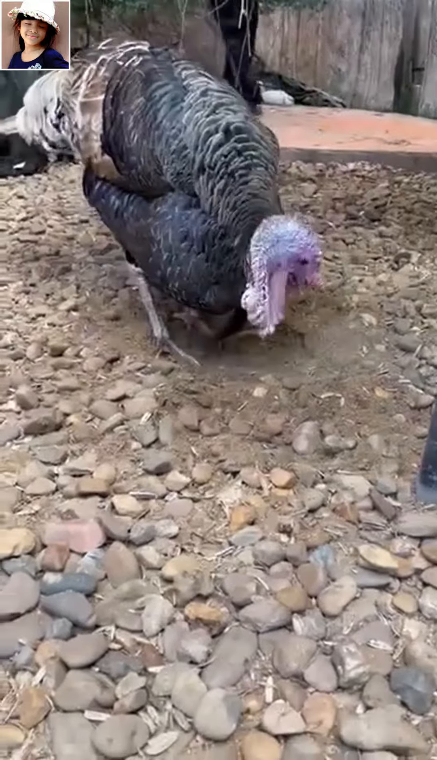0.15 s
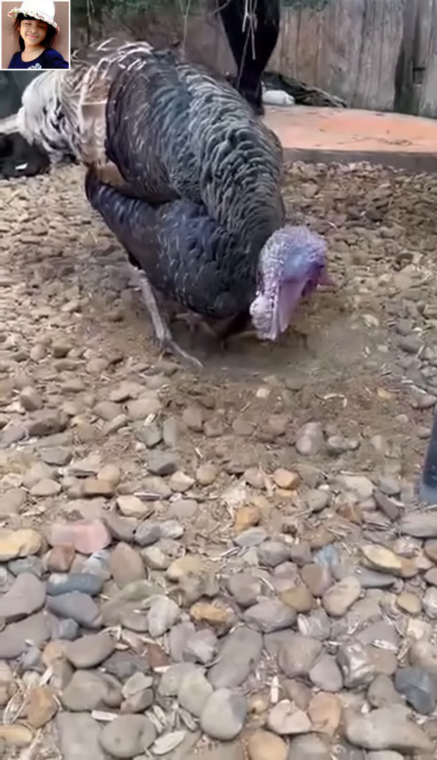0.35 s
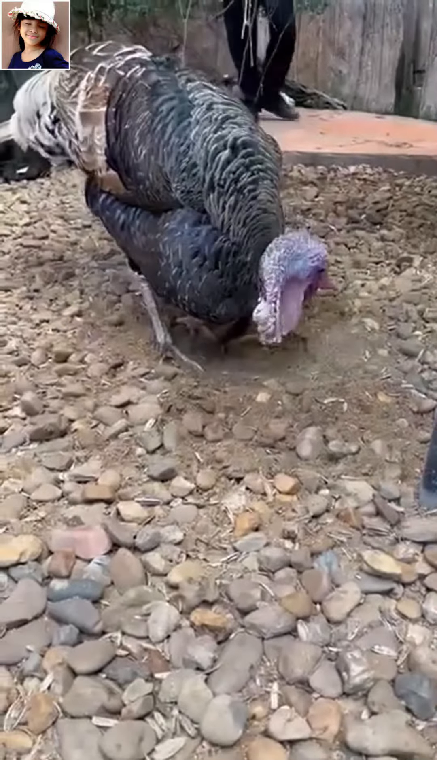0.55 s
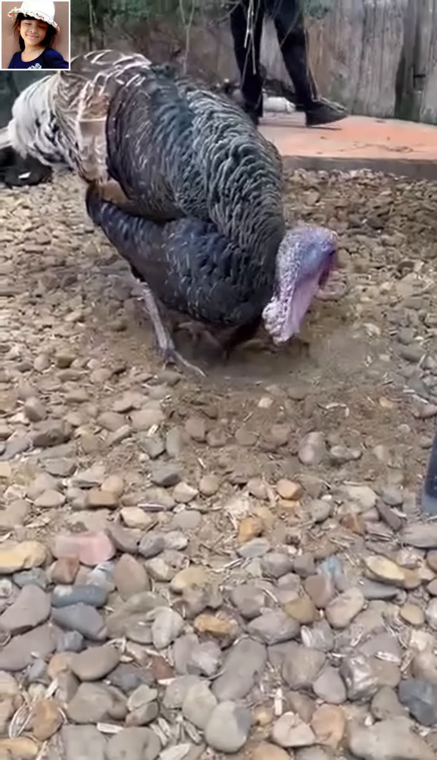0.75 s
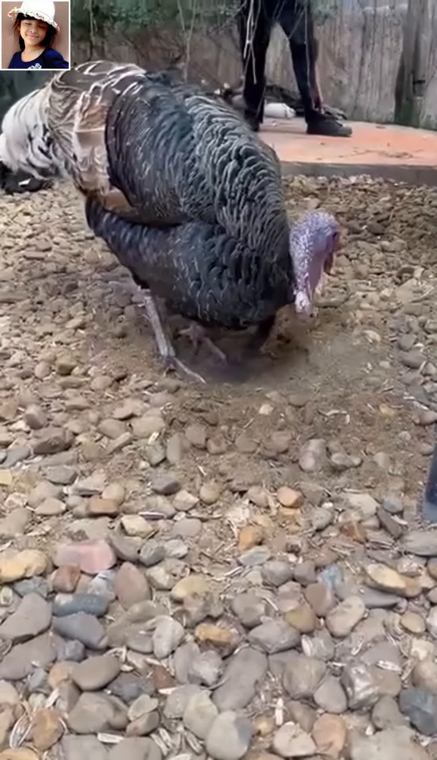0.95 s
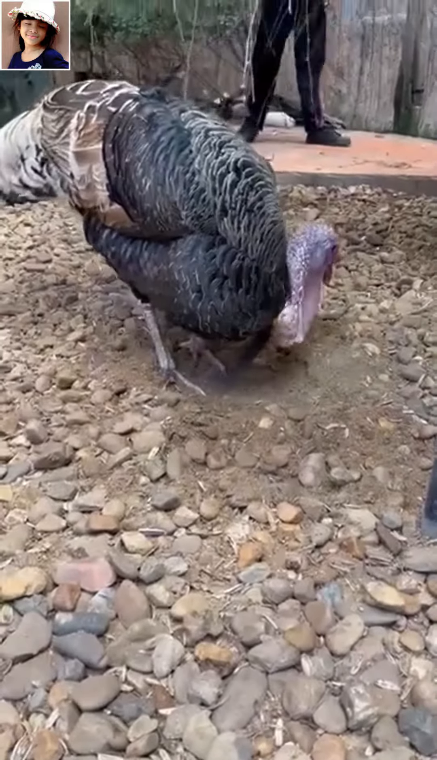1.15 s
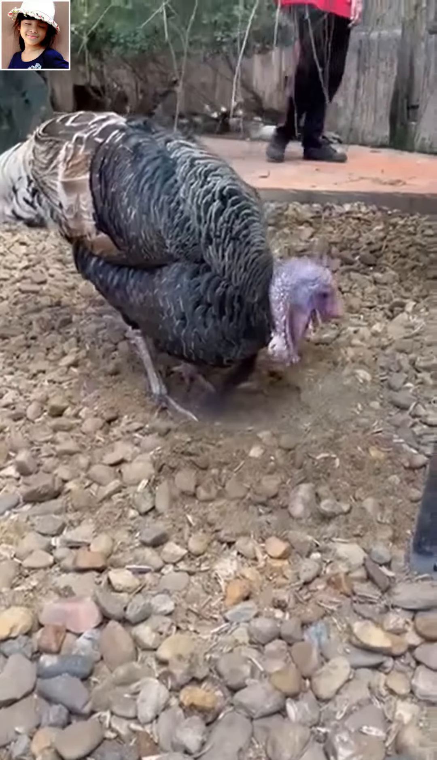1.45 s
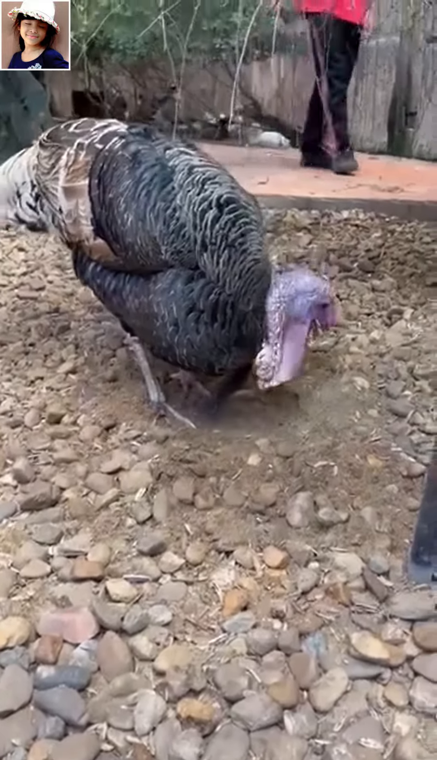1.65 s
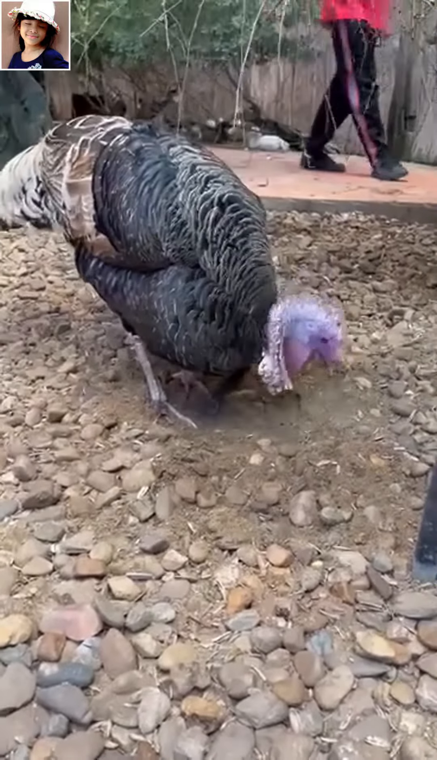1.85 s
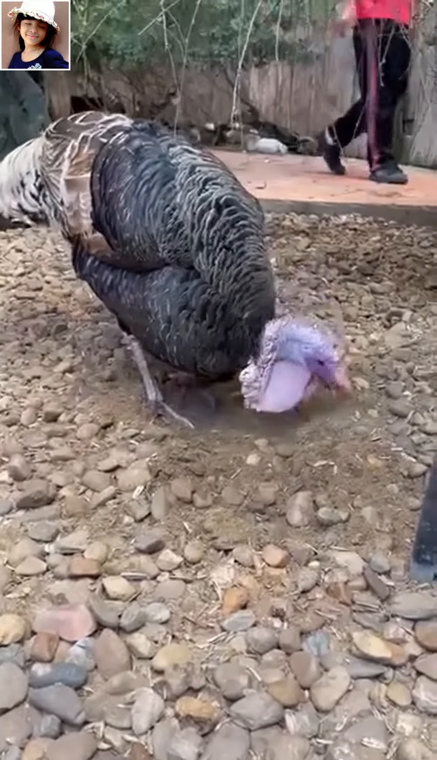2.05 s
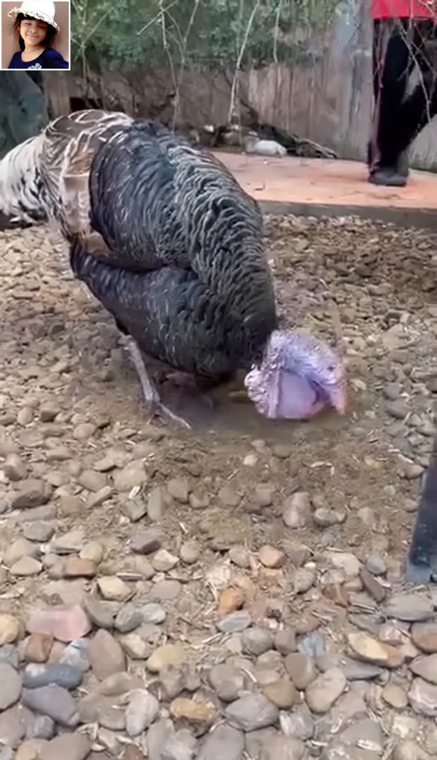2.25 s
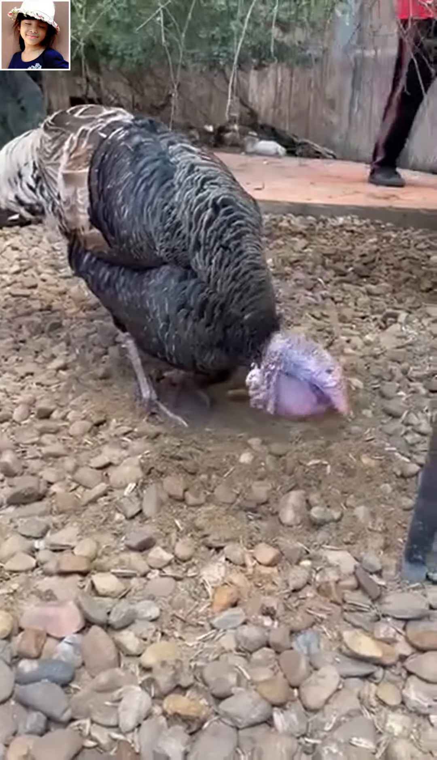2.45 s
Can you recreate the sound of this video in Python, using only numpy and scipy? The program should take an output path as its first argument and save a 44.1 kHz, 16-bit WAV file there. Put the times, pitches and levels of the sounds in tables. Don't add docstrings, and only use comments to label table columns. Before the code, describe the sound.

A close turkey gobbles in a loud, rapid, rattling burst, overlapped by a lower second bird, after quiet wind bumps, faint rustles and three thin whistled notes in a fenced gravel yard, on a handheld stereo microphone.

```python
import sys
import numpy as np
from scipy import signal
from scipy.fft import rfft, irfft, next_fast_len
from scipy.io import wavfile
from scipy.ndimage import uniform_filter1d

SR = 44100
rng = np.random.default_rng(int(sys.argv[2]) if len(sys.argv) > 2 else 0)


def voltage_ratio(decibels):
    exponent = np.asarray(decibels, float) / 20
    return 10 ** exponent


def unload_wav(signal):
    wavfile.write(
        sys.argv[1],
        SR,
        np.round(np.clip(np.atleast_2d(signal).T, -1, 1) * 32767).astype(np.int16),
    )


N = 114660


def evened(x):
    return x / np.sqrt(np.mean(x ** 2) + 1e-20)


def read(points, hz):
    f, value = np.transpose(points)
    return np.interp(np.log(hz + 1), np.log(f + 1), value)


def add(mix, s, sound):
    part = mix[round(s * SR):][:len(sound)]
    part += sound[:len(part)]


def resonate(x, hz, width):
    turn = np.exp(2j * np.pi * np.cumsum(hz * np.ones(len(x))) / SR)
    r = np.exp(-np.pi * width / SR)
    smooth = signal.lfilter([(1 - r) ** 2], [1, -2 * r, r * r], x / turn + 1e-18)
    return 2 * (turn * smooth).real


def noise(spectrum, same, patchy_db, level, size):
    frames, hz = 4 * N // size + 5, np.fft.rfftfreq(size, 1 / SR)
    a, b, c, d, patch = rng.standard_normal((frames, len(hz), 5)).T
    patch = uniform_filter1d(uniform_filter1d(patch, size=6, axis=0), size=6, axis=1)
    patch = evened(patch)
    first, other = a + 1j * b, c + 1j * d
    z = np.array([first, same * first + np.sqrt(1 - same ** 2) * other])
    z *= voltage_ratio(read(spectrum, hz)[:, None] + patchy_db * patch)
    z *= (hz >= spectrum[0][0])[:, None]
    x = signal.istft(z, nperseg=size, noverlap=3 * size // 4)[1][:, :N]
    return evened(x) * voltage_ratio(np.interp(np.arange(N) / SR, *np.transpose(level)))


# f/Hz, level/dB per Hz
WIND_SPECTRUM = [(12, -34), (20, -2), (87, -1), (193, -15), (261, -22), (400, -30), (520, -32.5),
                 (880, -120)]
# t/s, level/dB
GUSTS = [(0, -47), (.2, -53), (.4, -49.5), (1.2, -48.5), (1.3, -43), (1.6, -45.5), (1.8, -42), (2.3, -33),
         (2.6, -41.5)]


def wind():
    return voltage_ratio([[-2.5], [2.5]]) * noise(WIND_SPECTRUM, same=0.3, patchy_db=-4.0, level=GUSTS, size=2048)


# f/Hz, level/dB per Hz
HISS_SPECTRUM = [(120, -14), (200, -9.5), (621, -15), (803, -17.5), (2490, -20.5), (2830, -13),
                 (7890, -18.5), (11800, -16), (15800, -28.5)]
# t/s, level/dB
STIR_LEVEL = [(.9, 0), (1.1, 5), (1.5, 7.5), (1.62, 4.5), (1.7, 15), (2.3, 18.5), (2.4, 20), (2.6, 14.5)]


def yard_hiss():
    return voltage_ratio(-61.5) * noise(HISS_SPECTRUM, same=0.19, patchy_db=1.5, level=STIR_LEVEL, size=1024)


# t/s, length/s, level/dB, centre f/Hz, sag/share of f
BRUSHES = [
    (0.097, 0.066, -59, 7400, 0.019),
    (0.172, 0.13, -54, 6000, 0.3),
    (0.592, 0.099, -64.5, 4000, 0.022),
    (1, 0.07, -55.5, 5820, 0.13),
    (1.234, 0.34, -63, 11700, 0),
    (0.627, 0.35, -71.5, 590, 0.044),
    (1.584, .06, -60, 5700, .05),
]


def rustles():
    out = np.zeros(N)
    for start, length, db, hz, sag in BRUSHES:
        u = np.arange(0, 1, 1 / (SR * length))
        air, grain = rng.standard_normal((2, 16000))[:, :len(u)]
        brush = resonate(air * voltage_ratio(4.1 * grain), hz * (1 - sag * u), 0.38 * hz)
        add(out, start, voltage_ratio(db) * np.sin(np.pi * u ** 0.49) * evened(brush))
    return out


# t/s, length/s, level/dB, f/Hz
LOW_BOOMS = [(0.747, 0.17, -50.5, 88.3), (1.17, 0.11, -51, 84.3), (1.429, 0.048, -40.5, 86.8),
             (1.637, 0.065, -43.5, 132), (1.76, 0.057, -42, 137), (1.81, .045, -41.5, 139),
             (2.08, .04, -42, 75), (1.849, 0.072, -41, 121.8), (2.004, 0.068, -38, 127),
             (2.161, 0.045, -40, 127), (2.281, 0.085, -39, 125.5), (2.35, 0.11, -39, 146),
             (2.5, 0.072, -42, 127.5), (2.481, 0.18, -52.5, 401)]


def low_booms():
    out = np.zeros(N)
    for start, length, db, hz in LOW_BOOMS:
        t = np.arange(0, length, 1 / SR)
        waver = 1 + 0.07 * signal.resample(rng.standard_normal(10), 8000)[:len(t)]
        tone = np.sin(2 * np.pi * np.cumsum(hz * waver) / SR)
        add(out, start, voltage_ratio(db + 9) * np.sin(np.pi * t / length) ** 0.48 * tone)
    return out


# t/s, f/Hz, level/dB
WHISTLED = [
    [(0.89, 2100, -78), (0.918, 2251, -68), (0.952, 2397, -67), (0.974, 2444, -48.5), (0.99, 2396, -47),
     (1.04, 2393, -85), (1.05, 2347, -81)],
    [(1.08, 2710, -74), (1.094, 2780, -62), (1.122, 2877, -49.5), (1.17, 2881, -57), (1.18, 2871, -71),
     (1.2, 2839, -74)],
    [(1.27, 2946, -63), (1.3, 2948, -46.5), (1.348, 2830, -45), (1.372, 2630, -48), (1.46, 1970, -42.5),
     (1.51, 1740, -57), (1.6, 1660, -85)],
]


def whistle():
    out = np.zeros(N)
    for note in WHISTLED:
        s, hz, db = np.transpose(note)
        t = np.arange(s[0], s[-1], 1 / SR)
        f = uniform_filter1d(np.interp(t, s, hz), size=700)
        breath = rng.standard_normal(20000)[:len(t)]
        narrow = evened(resonate(breath, 0.79 * f, 130))
        wide = evened(resonate(breath, 0.72 * f, 470))
        air = narrow + 1.18 * wide
        tone = np.sqrt(2) * np.sin(2 * np.pi * np.cumsum(f) / SR)
        add(out, s[0], voltage_ratio(np.interp(t, s, db)) * (tone + voltage_ratio(-15.5) * air))
    return out


# f/Hz, width/Hz, level/dB
SYLLABLE_RESONANCES = [(1057, 385, 3), (1720, 1180, -8.5), (2474, 1120, -10), (3810, 2300, -19.5), (5050, 1480, -16),
                       (6640, 2200, -22.5), (8250, 1300, -28), (11210, 2300, -14.5), (14800, 1500, -27),
                       (10450, 270, -12.5), (11230, 360, -2.5), (11830, 320, -5), (13230, 230, -9)]


def syllable(start_s, length, effort_db, top_hz, beak_db, *, top_at, start, end, rise_s, fall_s,
             rough, half, close_db, third_db):
    flutter_db, jitter, puff = 4.5, 0.16, 3
    t = np.arange(0, length, 1 / SR)
    u = t / length
    white = rng.standard_normal((2, 8000))[:, :len(t)]
    slow = signal.resample(rng.standard_normal((12, 24)), 8000, axis=1)[:, :len(t)]

    before = (1 - start) * (1 - u / top_at) ** 2
    after = (1 - end) * ((u - top_at) / (1 - top_at)) ** 2
    wobble = 1 + jitter * uniform_filter1d(white[0], size=150)
    turns = np.cumsum(top_hz * (1 - np.where(u < top_at, before, after)) * wobble) / SR

    folds = np.zeros(len(t))
    for k in range(1, 12):
        tilt_db = -0.5 * k - 3 * max(k - 6, 0) + third_db * (k == 3)
        partial_db = flutter_db * slow[k] * min(k / 2, 1.3) / 1.2 + tilt_db
        folds += voltage_ratio(partial_db) * np.cos(2 * np.pi * k * turns)
    folds = folds * (1 + half * voltage_ratio(flutter_db * slow[0]) * np.cos(np.pi * turns))
    puffs = (1.33 + np.exp(-(turns % 1) / 1.55)) * white[1]
    shape = np.clip(np.minimum(t / rise_s, (length - t) / fall_s), 0, 1) ** 1.096
    drive = np.pad(shape * ((1 - rough) * folds + puff * rough * puffs), (0, 600))

    i = np.arange(len(drive))
    beak = voltage_ratio(beak_db + close_db * (i / len(t) - 0.5263))
    late = beak * np.minimum(i / (SR * 0.029 * length / 0.066), 1)
    pipe = 0
    for k, (hz, width, db) in enumerate(SYLLABLE_RESONANCES):
        opening = (1, beak, beak, late)[min(k, 3)]
        mode_hz = hz * (1 + 0.03 * white[0, k] * (width < 330))
        pipe = pipe + (-1) ** k * voltage_ratio(db) * resonate(drive * opening, mode_hz, width)
    rasp = voltage_ratio(-17) * resonate(drive, 494, 660)
    return start_s, voltage_ratio(effort_db + 4.5) * (pipe + rasp)


def bird(*parts):
    out = np.zeros(N)
    for rows, shape in parts:
        for row in rows:
            add(out, *syllable(*row, **shape))
    return out


# top_at, start, end, rough, half as shares; rise_s, fall_s /s; close_db, third_db /dB.
OPENING_CALL = [
    (1.634, 0.1, -29.5, 1308, 8.5),
]
OPENING_FORM = dict(top_at=.6, start=.8, end=.8, rise_s=.03, fall_s=.02, rough=.1, half=.12, close_db=-30, third_db=-16)
LONG_GOBBLES = [
    (2.122, 0.13, -21.5, 1274, 1),
    (2.298, 0.045, -21, 1227, -12),
    (2.38, 0.073, -26.5, 1168, -6),
    (2.44, 0.051, -15.5, 1211, -7),
    (2.495, 0.1, -19, 1256, -3.5),
]
LONG_FORM = dict(top_at=.6, start=.8, end=.8, rise_s=.022, fall_s=.02, rough=.15, half=.25, close_db=-11, third_db=-7)
RISING_YELP = [
    (1.89, .082, -30.5, 1675, 14.5),
]
YELP_FORM = dict(top_at=2.5, start=.635, end=.97, rise_s=.025, fall_s=.015, rough=.15, half=.25, close_db=0, third_db=4)
SHORT_CLUCKS = [(1.695, 0.04, -18.5, 1274, -5.5), (1.765, 0.031, -25.5, 1199, -5),
                (1.821, 0.03, -11, 1263, -4.5), (1.874, 0.047, -17.5, 1177, -4),
                (1.962, 0.025, -14, 1163, -5.5), (2.017, 0.036, -17.5, 1111, -8),
                (2.066, 0.045, -18.5, 1289, -6), (2.191, 0.035, -14, 1218, -0.5),
                (2.238, 0.042, -31.5, 1229, 16), (2.325, 0.027, -17, 1048, -7.5),
                (2.138, 0.024, -15.5, 1162, 1), (2.174, 0.024, -15, 1266, -12),
                (2.412, 0.026, -21, 1230, -7), (2.434, 0.013, -14.5, 1120, 6),
                (1.868, 0.014, -24, 1270, 14), (2.576, .018, -30, 1034, 11), (2.118, 0.027, -23.5, 1363, 3)]
CLUCK_FORM = dict(top_at=.3, start=.96, end=.87, rise_s=.018, fall_s=.013, rough=.17, half=.05, close_db=-8, third_db=-9)


def near_turkey():
    return bird((OPENING_CALL, OPENING_FORM), (LONG_GOBBLES, LONG_FORM),
                (RISING_YELP, YELP_FORM), (SHORT_CLUCKS, CLUCK_FORM))


SECOND_GOBBLES = [(1.825, 0.053, -29, 992, 7.5), (1.91, 0.0555, -35, 970, 14),
                  (2.07, 0.028, -14.5, 1055, -1.5), (2.125, 0.11, -30, 1114, 10),
                  (2.245, 0.038, -18, 1024, -2.5), (2.27, 0.052, -27, 907, 13),
                  (2.478, 0.038, -18, 1057, 1), (2.495, 0.075, -27, 985.4, 7.5),
                  (2.39, 0.023, -19.5, 899, -3.5), (1.636, 0.037, -34.5, 949, -12),
                  (2.56, 0.041, -26, 864, 1)]
SECOND_FORM = dict(top_at=.3, start=.96, end=.86, rise_s=.015, fall_s=.02, rough=.2, half=.1, close_db=-4, third_db=-13)


def second_turkey():
    return bird((SECOND_GOBBLES, SECOND_FORM))


# t/s, length/s, level/dB, centre f/Hz, width/Hz
HISSES = [(1.652, 0.027, -36, 5700, 380), (1.658, 0.026, -37, 6600, 270),
          (1.77, 0.03, -42.5, 5000, 180), (2.291, 0.031, -29, 4850, 100),
          (2.291, 0.044, -28.5, 5730, 1260), (2.5, .05, -28, 11700, 2200),
          (3.2, 0.035, -35, 14500, 1800), (2.286, 0.052, -31.5, 8850, 2500),
          (2.43, .17, -37, 11700, 2400), (1.9, 0.05, -38, 8600, 1500),
          (2.43, 0.17, -41.5, 8300, 2800), (2.43, 0.018, -41, 6100, 500),
          (2.428, 0.013, -42, 4300, 300), (2.372, 0.019, -30, 11160, 210),
          (2.374, 0.011, -41.5, 5300, 1700), (2.468, 0.047, -31, 4850, 60),
          (2.498, 0.023, -22, 4850, 176), (2.525, 0.049, -27, 4900, 250)]


def hisses():
    out = np.zeros(N)
    for start, length, db, hz, width in HISSES:
        u = np.arange(0, 1, 1 / (SR * length))
        air = resonate(rng.standard_normal(8000)[:len(u)], hz, width)
        add(out, start, voltage_ratio(db + 4.5) * np.sin(np.pi * u ** 0.58) * evened(air))
    return out


# f/Hz, level/dB
PORT_BALANCE = [(60, 0), (1500, 1.5), (5000, -0.5), (12000, 7.5)]
# f/Hz, phase/rad
PORT_PHASE = [(150, 0.42), (1150, -0.65), (2000, -1.34), (5000, -1.87), (12000, -1.38)]


def ports(x, side):
    n = next_fast_len(N + 2048)
    hz = np.fft.rfftfreq(n, 1 / SR)
    half = voltage_ratio(read(PORT_BALANCE, hz) / 2) * np.exp(0.5j * side * read(PORT_PHASE, hz))
    return irfft(rfft(x, n) * np.array([half, 1 / half]), n)[:, :N]


# f/Hz, t60/s
YARD_DECAY = [(800, 0.14), (3000, 0.15), (8000, 0.13)]


def yard(x):
    taps = np.zeros((2, SR // 2))
    at = np.arange(200, SR // 2 - 20, 20)
    at = at + rng.integers(0, 20, (2, len(at)))
    np.put_along_axis(taps, at, rng.choice([-1., 1.], at.shape), 1)
    hz, t, z = signal.stft(taps, SR, nperseg=256)
    decay = voltage_ratio(-60 * t / read(YARD_DECAY, hz)[:, None])
    tail = signal.istft(z * decay, SR, nperseg=256)[1]
    return signal.fftconvolve(x[None], tail / np.linalg.norm(tail[0]), axes=1)[:, :N]


def scene():
    near = near_turkey() + low_booms() + hisses() + whistle() + rustles()
    second = second_turkey()
    hiss = yard_hiss()
    direct = ports(near, 0.77) + ports(second, -1.14)
    return direct + voltage_ratio(-10.5) * yard(near + second) + hiss + wind()


def low_pass(x):
    return signal.sosfilt(signal.butter(12, 15850, fs=SR, output="sos"), x)


def record(dry):
    lowpass = signal.firwin(511, 15800, window=("kaiser", 9), fs=SR)
    cut = signal.oaconvolve(dry, lowpass[None], "same")
    return low_pass(cut)


dry = scene()
out = record(dry)
unload_wav(out)
```